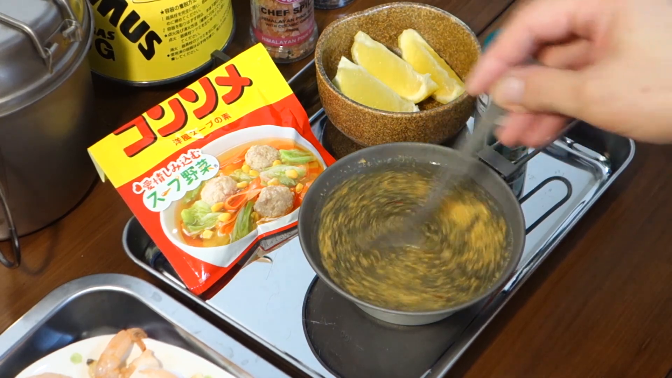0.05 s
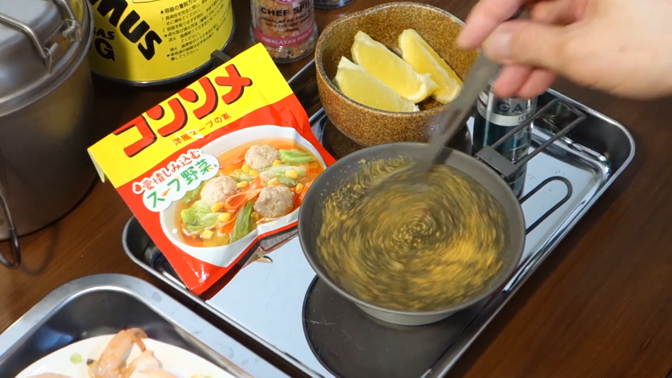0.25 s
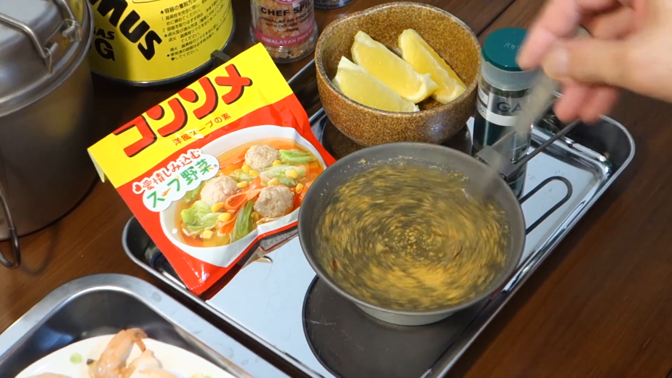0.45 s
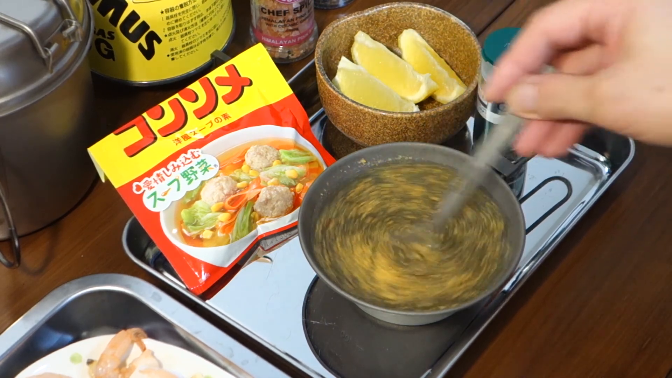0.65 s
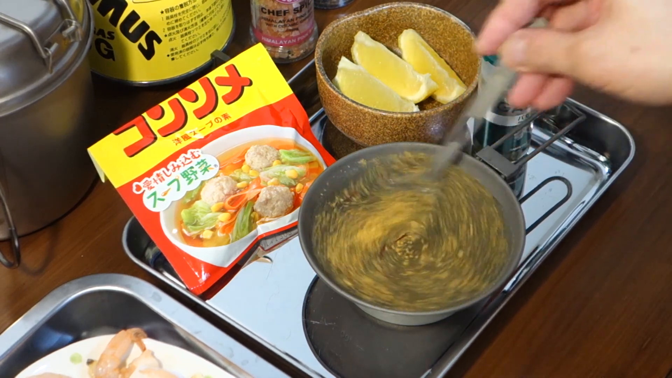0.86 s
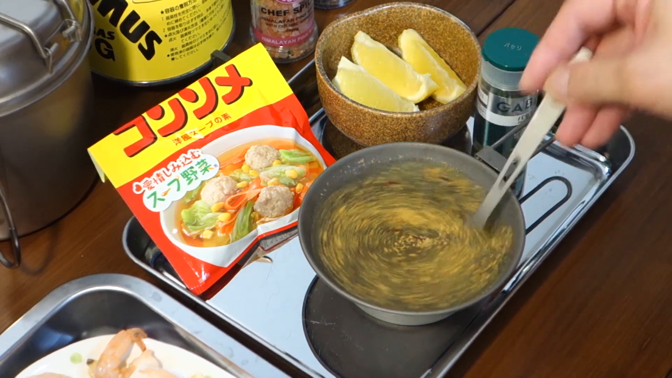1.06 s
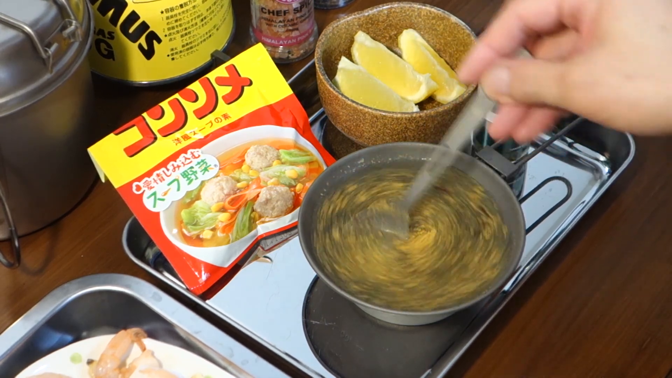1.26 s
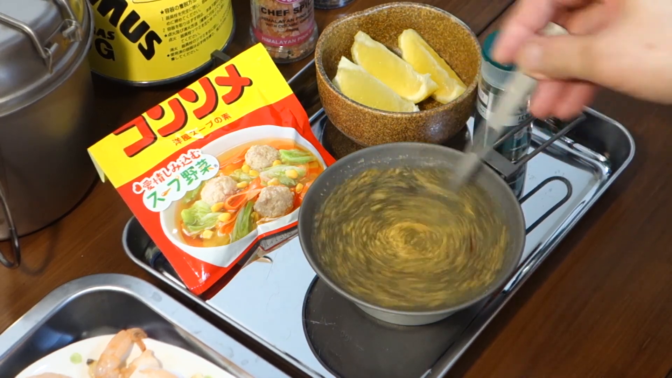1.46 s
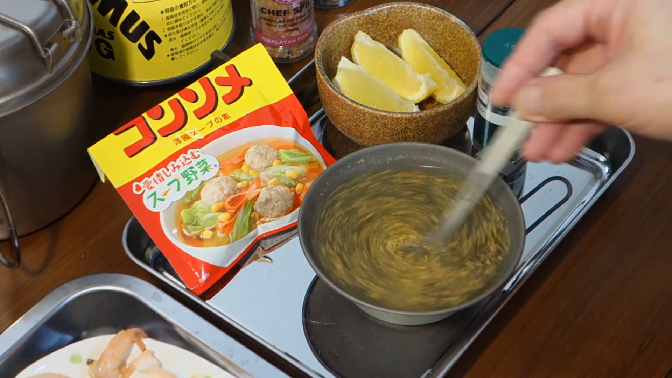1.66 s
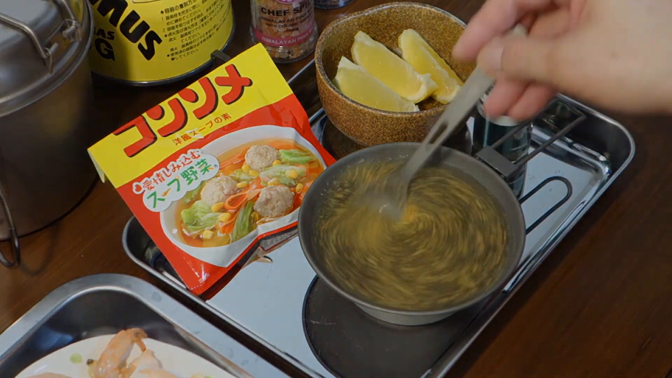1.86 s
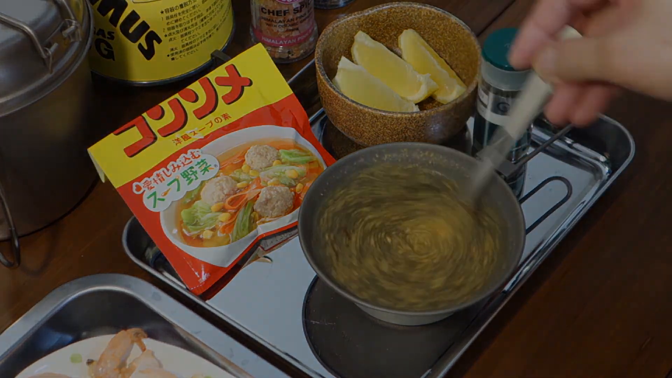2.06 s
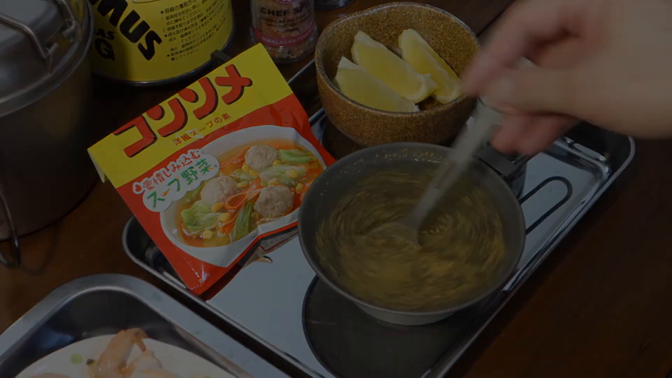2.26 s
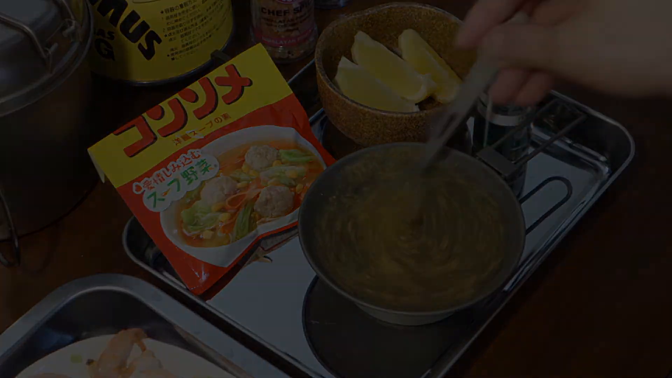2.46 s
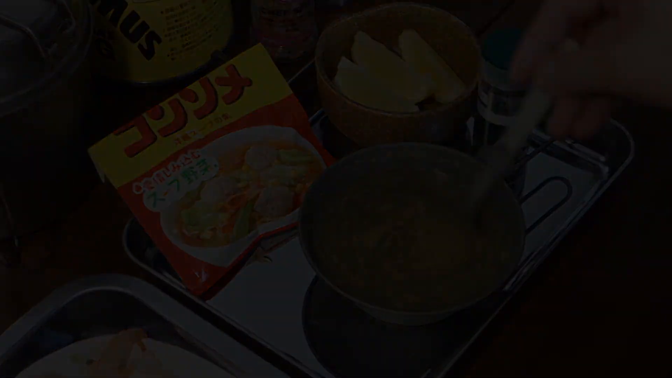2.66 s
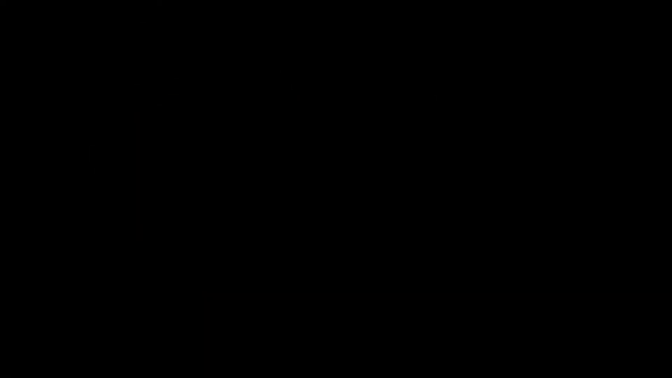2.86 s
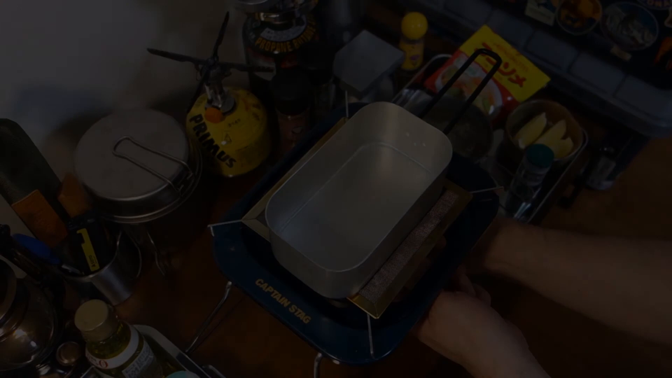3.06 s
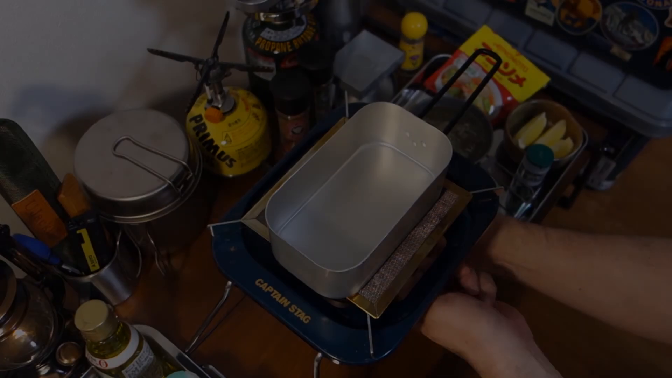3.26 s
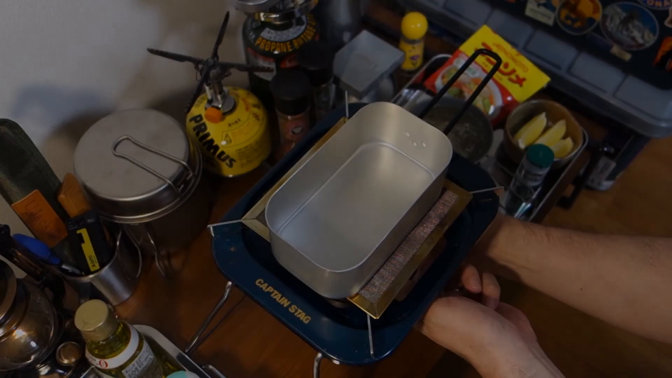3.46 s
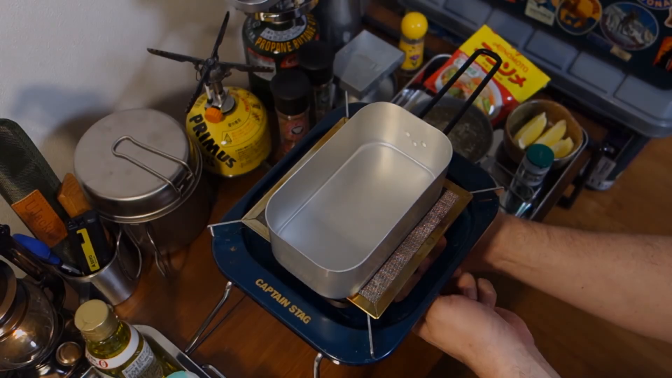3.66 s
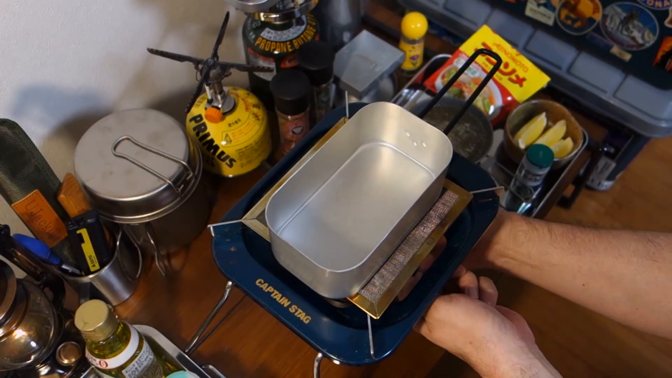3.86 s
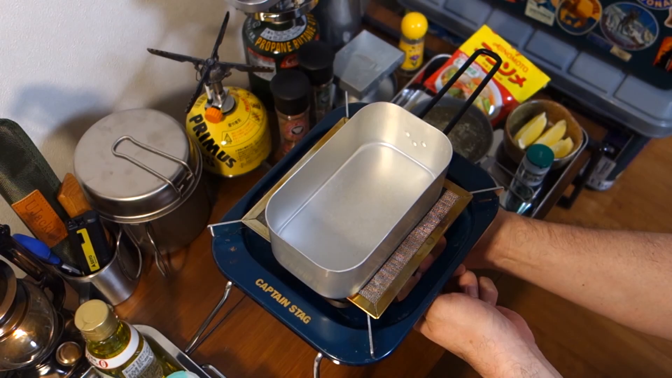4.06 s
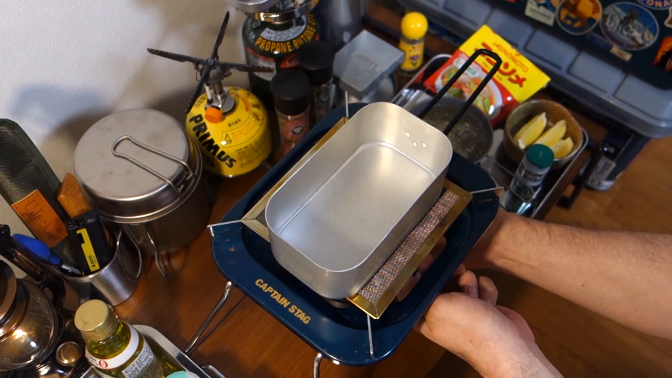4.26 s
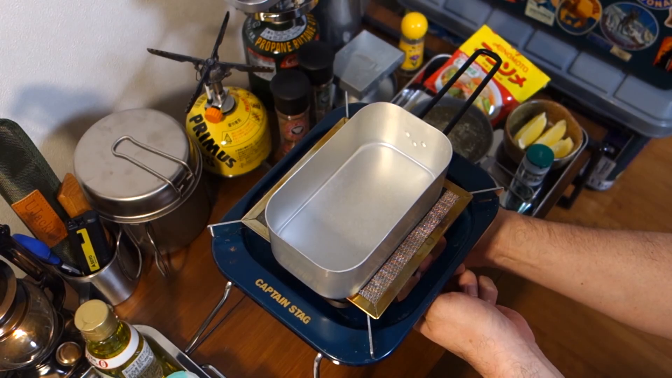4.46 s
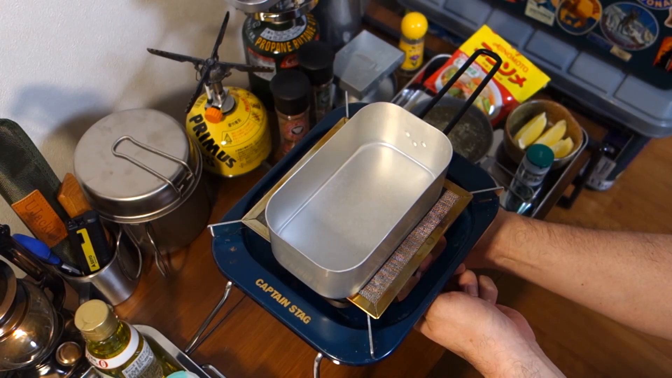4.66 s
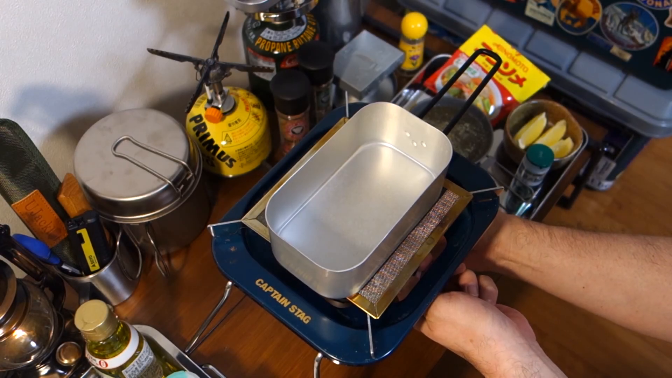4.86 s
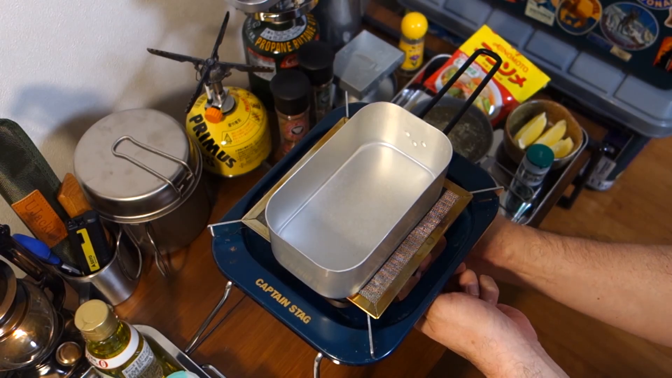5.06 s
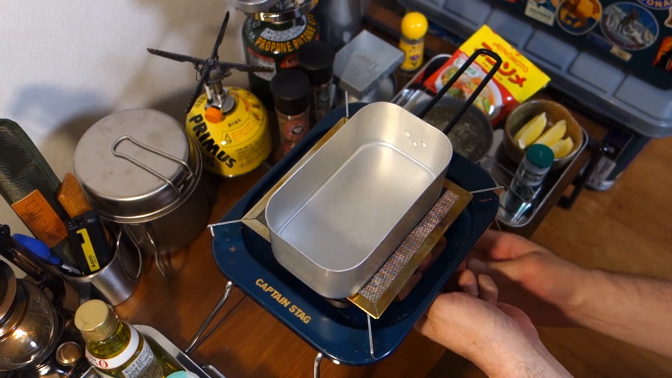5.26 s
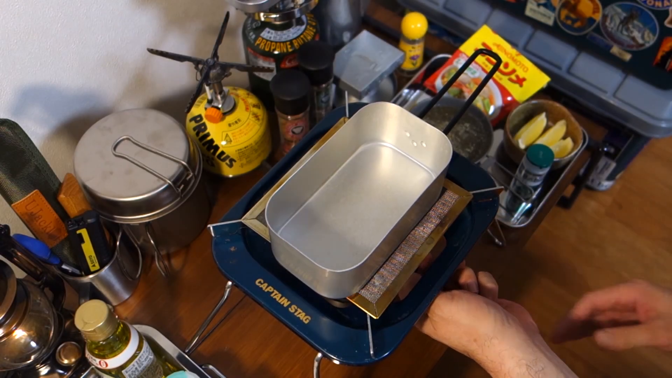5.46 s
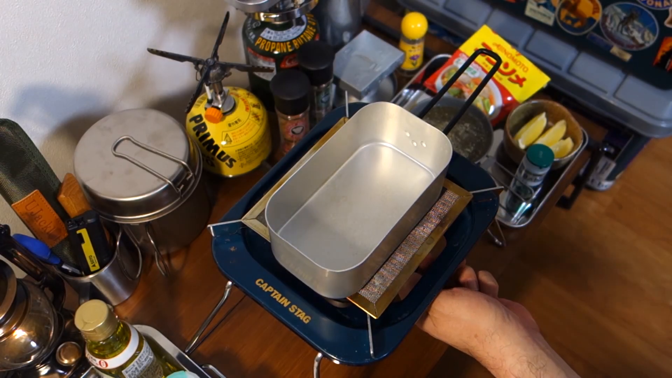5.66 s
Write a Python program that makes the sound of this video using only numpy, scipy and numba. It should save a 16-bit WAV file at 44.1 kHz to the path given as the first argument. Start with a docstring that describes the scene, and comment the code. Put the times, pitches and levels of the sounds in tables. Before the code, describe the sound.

A spoon stirs soup in a small metal bowl, with light, irregular taps and short scrapes over a soft swirl. The stirring fades to silence. Then a gas stove fades in: a faint bump, a thin hiss of gas, and one loud, sharp igniter snap. The burner lights, the knob clicks back and the hiss continues. It all sounds close, in a small room with a steady fan-like rush.

```python
"""A small room with a steady, fan-like rush, where two scenes play one after the other.
First a spoon stirs soup in a small metal bowl, tapping and scraping the wall; this fades out.
Then a gas stove fades in: a hand bumps it, the valve opens and gas hisses, the piezo igniter
(a spring hammer that makes a spark) snaps, the burner lights and the knob clicks back.
A limiter, which turns loud moments down, flattens the snap."""
import sys
import numpy as np
from scipy import signal
from scipy.fft import rfft, irfft
from scipy.io import wavfile
from scipy.ndimage import uniform_filter1d
from numba import njit

SR = 44100
rng = np.random.default_rng(int(sys.argv[2]) if len(sys.argv) > 2 else 0)


def wav_record(signal):
    """Record a signal, one row per channel, as 16-bit PCM in the file named by sys.argv[1]."""
    frames = np.transpose(np.atleast_2d(signal))
    bounded = np.clip(frames, -1, 1)
    # unit amplitude maps onto the largest positive 16-bit level
    quanta = np.round(bounded * 32767).astype(np.int16)
    wavfile.write(sys.argv[1], SR, quanta)


N = 251370
T = np.arange(N) / SR
RING_T = T[:SR // 2]  # time axis for short sounds
HZ = np.fft.rfftfreq(16384, 1 / SR) + 1e-3  # frequency axis for tone curves

# broad tone of the bowl of soup: f/Hz, level/dB
BOWL_TONE = [(120, -61), (200, -18), (286, -15.5), (444, -24.5), (535, -0.5), (968, -18), (1070, -8),
             (2180, 2), (2500, -4), (3890, -5), (4530, -17.5), (5740, -8), (11500, -11.5), (15000, -79),
             (22000, -120)]
# the bowl's modes, the pitches it rings at: f/Hz, width/Hz, level/dB
BOWL_MODES = [(543.4, 47, -3.5), (930, 250, -5.5), (1576, 160, -6.5), (1743, 54, -11), (2060, 210, -5.5),
              (2285, 88, -4.5), (3010, 25, -4), (4036, 174, -2.5), (4090, 100, -18.5), (5710, 200, -14.5),
              (6380, 76, -21.5)]
# stereo width, what differs between the ears against what they share: f/Hz, level/dB
STEREO_WIDTH = [(100, -24.5), (400, -18.5), (1000, -12), (2200, -8.5), (4000, -2), (8500, 0)]


def amp(db):
    """Turn decibels into a gain."""
    return 10 ** (np.asarray(db) / 20)


def unit(x):
    """Scale to an average power of 1."""
    return x / np.sqrt(np.mean(x ** 2))


def curve(points):
    """A tone curve (gain at each frequency) through points of f/Hz, level/dB."""
    hz, db = np.transpose(points)
    return amp(np.interp(np.log(HZ), np.log(hz), db))


def peaks(modes):
    """A tone curve with a peak for each row of f/Hz, width/Hz, level/dB."""
    return np.sqrt(sum(amp(db) ** 2 / (1 + ((HZ / hz - hz / HZ) * hz / width) ** 2)
                       for hz, width, db in modes))


def convolve(x, response):
    """Pass x through a response, keeping its length."""
    return signal.fftconvolve(np.atleast_2d(x), np.atleast_2d(response), axes=1)[:, :x.shape[-1]]


def colour(x, tone):
    """Filter x with a tone curve; white noise keeps its level."""
    cepstrum = irfft(np.log(unit(tone) + 1e-6))
    half = len(cepstrum) // 2
    # folding makes the filter ring only after a sound, never before it
    cepstrum[1:half] *= 2
    cepstrum[half + 1:] = 0
    return convolve(x, irfft(np.exp(rfft(cepstrum)))[:half])


@njit
def resonate(x, hz, width_hz):
    """Let through a band around a moving pitch."""
    out, band_state, low_state = np.empty(len(x)), 0., 0.
    for i in range(len(x)):
        step, damping = np.tan(np.pi * hz[i] / SR), width_hz / hz[i]
        band = (band_state + step * (x[i] - low_state)) / (1 + step * (step + damping))
        band_state = 2 * band - band_state
        low_state += 2 * step * band
        out[i] = damping * band
    return out


def stereo_noise(size):
    """White noise: alike in both ears in the bass, unrelated in the treble."""
    mid, side = rfft(rng.standard_normal((2, size)))
    width = np.interp(np.fft.rfftfreq(size, 1 / SR), HZ, curve(STEREO_WIDTH))
    return irfft(np.array([mid + width * side, mid - width * side]) / np.sqrt(1 + width ** 2), size)


def wander(turns_per_s):
    """A smooth random drift, about 1 in size."""
    hold = int(SR / turns_per_s)
    steps = np.repeat(rng.standard_normal(N // hold + 1), hold)
    return unit(uniform_filter1d(steps, hold)[:N])


def ramp(start_s, length_s):
    """Rise in a straight line from 0 to 1."""
    return np.clip((T - start_s) / max(length_s, 1e-3), 0, 1)


def decay(t60):
    """Die away by 60 dB in t60 seconds."""
    return np.exp(-np.log(1000) * RING_T / t60)


def add(out, start_s, sound):
    """Mix a sound in at its start time."""
    i = int(start_s * SR)
    out[:, i:i + sound.shape[1]] += sound[:, :N - i]


def echoes():
    """The room's dense echoes; the treble dies first."""
    # time the echoes take to fall by 60 dB: f/Hz, t/s
    echo_times = [(200, 0.34), (900, 0.34), (3000, 0.25), (6500, 0.24), (11000, 0.18)]
    hz, t60s = np.transpose(echo_times)
    size = len(RING_T)
    spectrum, bin_hz = rfft(stereo_noise(size)), np.fft.rfftfreq(size, 1 / SR)
    return sum(irfft(spectrum * np.interp(bin_hz, hz, band), size) * decay(t60)
               for band, t60 in zip(np.eye(len(hz)), t60s))


def room(x, echo_db):
    """Blend the direct sound with its echoes."""
    tail = echoes()
    echoed = convolve(x, tail / np.sqrt(np.sum(tail ** 2) / 2))
    return (x + amp(echo_db) * echoed) / np.hypot(1, amp(echo_db))


def fan(rush_db, hum_db):
    """A steady rush of air with a wavering fan hum."""
    # tone of the rushing air: f/Hz, level/dB
    rush_tone = [(18, -50), (30, -63.5), (155, -9.5), (243, -11.5), (283, -5), (320, -8), (644, -3),
                 (3870, -19), (5220, -25.5), (7220, -23), (11600, -30), (15100, -76), (22000, -120)]
    # peaks of the hum: f/Hz, width/Hz, level/dB
    hum_peaks = [(279.9, 7.9, -0.5), (393, 56, -5)]
    rush = colour(stereo_noise(N), curve(rush_tone)) * amp(rush_db + .5 * wander(6))
    hum = colour(stereo_noise(N), peaks(hum_peaks) ** 2) * amp(hum_db)
    return rush + hum


def bowl(modes_db=-4):
    """The bowl's tone curve: soup damps it, so it rings only briefly."""
    return unit(curve(BOWL_TONE)) + amp(modes_db) * unit(peaks(BOWL_MODES))


def swirl(level_db=-66, flutter_db=2):
    """The spoon glides through the soup, dull and soft."""
    muffled = curve([(300, -3), (1500, 5.5), (2400, -10), (4500, -10)])
    return colour(stereo_noise(N), bowl() * muffled) * amp(level_db + flutter_db * wander(8.8))


def taps(chatter_t60=0.092, ring_t60=0.1, ring_width_hz=300, noisy_db=-4, clean_db=-3):
    """The spoon hits the wall with a short chatter and a damped, partly noisy ring."""
    # the spoon's hits: t/s, level/dB, ring f/Hz, ring level/dB, treble level/dB
    hits = [(0.3645, -42, 2150, -9, -6), (0.934, -44.5, 4320, -3, -5), (1.079, -47, 2520, 4, 8),
            (1.143, -51.5, 2476, 8, -8), (1.4694, -49.5, 2839, 6, 4), (1.504, -43, 1490, 2.5, -10),
            (1.545, -44, 1570, -6, -1), (1.678, -40, 2366, -1, -16.5), (2.053, -43.5, 1900, -5, -3),
            (2.299, -48, 1664, -2, -5), (2.539, -36.5, 1680, -7, -10), (2.692, -40, 1900, -6, 0)]
    out = np.zeros((1, N))
    for start_s, db, hz, ring_db, treble_db in hits:
        brightness = curve([(2500, 0), (5000, treble_db + 2.5)])
        chatter = rng.standard_normal(len(RING_T)) * decay(chatter_t60)
        clean = np.sin(2 * np.pi * hz * RING_T) * decay(ring_t60) * (1 - decay(0.0033))
        noisy = colour(chatter, peaks([(hz, ring_width_hz, 0)]) ** 2)
        ring = amp(clean_db) * clean + amp(noisy_db) * noisy
        knock = colour(chatter, bowl() * brightness)
        add(out, start_s, amp(db) * (knock + amp(ring_db) * ring))
    return room(out, echo_db=-2.5)


def strokes(bite_db=-10.5, lift_db=-11.5, grit_per_db=0.33, octaves_per_db=0.17):
    """Force and tone as each stroke bites, presses, holds and lifts; pressure raises grit and pitch."""
    # drags along the wall: t/s, rise/s, hold/s, release/s, grit level/dB, body level/dB,
    # contact level/dB, contact f/Hz, level/dB
    drags = [(.39, 0.089, .02, 0.075, -7.5, -4, -1.5, 2880, -40.5),
             (.58, 0.0097, 0.015, 0.032, -2, -2, -1, 3200, -44.5),
             (0.963, 0.048, 0.09, 0.051, -3.5, 0.5, 0, 3790, -44.5),
             (1.503, 0.0042, .03, 0.026, -7, 1, 7.5, 1420, -54.5),
             (1.538, 0.0287, 0.017, 0.018, -3.5, -1.5, 2.5, 3200, -46.5),
             (2.051, 0.028, .015, 0.053, -7.5, 1, -6, 1670, -46.5),
             (2.299, 0.0022, .008, 0.035, -14, -3.5, 4, 710, -51),
             (2.334, 0.025, 0.011, .04, -1, 0, -2, 2040, -53),
             (2.573, 0.065, 0.057, .048, -5, 4, -2, 3040, -45.5)]
    force = np.zeros(N)
    tone = np.ones((4, N)) * np.array(drags[0][4:8])[:, None]
    for start_s, rise, hold, release, grit_db, body_db, contact_db, hz, db in drags:
        begun = T >= start_s
        lifted = ramp(start_s + rise + hold, release)
        press_db = bite_db * (1 - ramp(start_s, rise)) + lift_db * lifted  # 0 at full pressure
        force += amp(db + press_db) * begun * (lifted < 1)
        pitch = hz * 2 ** (octaves_per_db * press_db)
        stroke_tone = np.broadcast_arrays(grit_db + grit_per_db * press_db, body_db, contact_db, pitch)
        tone = np.where(begun, stroke_tone, tone)
    return force, *tone


def scraping(slips_per_s=5000, scatter_db=3, modes_db=-4, wander_db=4, contact_width_hz=650.):
    """The spoon sticks and slips on the wall; each tiny slip shakes the bowl."""
    # fine rasp of metal on metal: f/Hz, level/dB
    grit_tone = [(3800, -28), (5000, 8.5), (6500, 8.5), (8000, -3.5), (9700, 5), (11500, -16.5)]
    force, grit_db, body_db, contact_db, pitch = strokes()
    slips = (rng.random(N) < slips_per_s / SR) * rng.choice([-1, 1], N)
    slips = unit(slips * amp(scatter_db * wander(500)))
    body = colour(slips, curve(BOWL_TONE) * curve([(4300, 3), (5500, -25)]))
    modes = 0
    for hz, width, db in BOWL_MODES:
        gain = amp(db + wander_db * wander(14))  # each place on the wall favours other modes
        bent_hz = hz * (1 + 0.0059 * wander(10))  # swirling soup bends their pitch
        modes += gain * resonate(slips, bent_hz, float(width))
    # hard metal drives the upper modes more than the low ones
    modes = colour(unit(modes), curve([(1700, -5), (2400, 0.002)]))
    contact = unit(resonate(resonate(slips, pitch, contact_width_hz), pitch, contact_width_hz))
    grit = colour(slips, curve(grit_tone))
    scrape = amp(body_db) * body + amp(modes_db) * modes + amp(contact_db) * contact + amp(grit_db) * grit
    return room(force * scrape, echo_db=-1)


def clack(tone, modes, crack_db, crack_t60, ring_db, ring_t60):
    """A blow on the stove: a crack, the room's echoes and ringing sheet metal."""
    crack = amp(crack_db) * stereo_noise(len(RING_T)) * decay(crack_t60)
    ring = 0
    for hz, db in modes:
        # higher modes die sooner and reach the two ears further out of step
        phase = 2 * np.pi * rng.random()
        ear_shift = np.interp(hz, HZ, curve(STEREO_WIDTH)) * rng.choice([-.7, .7])
        wave = np.sin(2 * np.pi * hz * RING_T + phase + ear_shift * np.array([[1], [-1]]))
        ring += amp(db) * wave * decay(ring_t60 / (1 + hz / 25000))
    return colour(crack + echoes(), tone) + amp(ring_db) * ring * (1 - decay(0.005))


def knob(body_db=-3):
    """The hand bumps the stove, fires the igniter and lets the knob spring back."""
    # tone of the igniter's hammer: f/Hz, level/dB
    hammer_tone = [(71, -51), (120, -64), (295, -4.5), (416, -26), (576, -6), (684, -28), (861, -8),
                   (1100, -28), (1240, -8), (1620, -4), (2070, -9), (2760, -7.5), (5500, -9), (5940, -9),
                   (11600, 3), (15100, -53), (22000, -120)]
    # clusters of sheet-metal modes: f/Hz, width/Hz, level/dB
    stove_body = [(930, 91, -4), (1290, 72, -11), (2070, 89, -1), (2980, 72, -3.5), (3360, 49, -19),
                  (4440, 540, -5.5), (6040, 180, -0.5), (7420, 160, 1)]
    # ring of the sheet metal: f/Hz, level/dB
    stove_modes = [(830, -6), (883, -2), (974, -3), (1040, -5), (1220, -4), (1265, -3), (1317, -5),
                   (1707, -9), (2071, 0), (2156, -5), (2278, -6), (3365, -7), (4136, -9), (4434, -8),
                   (5729, -7), (6012, -5), (6045, -6), (7500, -9), (8867, -8), (10933, -6), (11051, -6)]
    # tone of the knob springing back: f/Hz, level/dB
    click_tone = [(88, -36), (150, -40), (294, -12), (431, -32), (546, -14.5), (800, -12), (876, -3.5),
                  (1460, -18), (2220, -13.5), (2560, -15), (2760, -10.5), (4590, -5), (4930, -11),
                  (6030, -2), (11600, -20), (15100, -50), (22000, -120)]
    # ring after that click: f/Hz, level/dB
    click_modes = [(880, -4), (2160, -8), (2751, -8), (3320, -5), (4030, -7), (4710, -5), (6060, -2),
                   (6975, -4), (7100, -4), (7495, -4)]
    bump_tone = curve([(70, -40), (150, 9), (500, -5), (1600, 4), (2600, -11), (5000, -7), (11000, -24)])
    bump_modes = [(143, -4.5), (1600, -5.5)]
    snap_tone = np.hypot(unit(curve(hammer_tone)), amp(body_db) * unit(peaks(stove_body)))
    bump = clack(bump_tone, bump_modes, crack_db=4.5, crack_t60=.04, ring_db=-3.5, ring_t60=0.69)
    snap = clack(snap_tone, stove_modes, crack_db=5.5, crack_t60=0.069, ring_db=-10, ring_t60=0.23)
    click = clack(curve(click_tone), click_modes, crack_db=8, crack_t60=.061, ring_db=-.5, ring_t60=.14)
    out = np.zeros((2, N))
    add(out, 3.212, amp(-50) * bump)
    add(out, 4.4155, amp(-13.5) * snap)
    add(out, 4.8223, amp(-30) * click)
    return out


def burner(valve_s=3.7, valve_lag_s=0.12, ignite_s=4.43, gas_db=-62.5, flame_db=-72):
    """Gas whistles through the jet and mixing tube; the flame catches, flares and flutters low."""
    # whistles of the jet before lighting: f/Hz, width/Hz, level/dB
    cold_jet = [(5800, 89, 1), (6150, 70, -1), (7800, 74, 11), (8380, 130, 10), (8970, 70, 9),
                (11000, 180, -1)]
    # its shifted whistles once lit: f/Hz, width/Hz, level/dB
    lit_jet = [(5770, 23, -1), (6030, 27, -8), (8330, 110, -5), (9150, 29, 1), (9440, 46, -7),
               (10900, 190, -18)]
    treble = curve([(3500, -35), (5500, -9)])
    rush_tone = curve([(4000, -26), (6000, -3), (7000, -10), (8600, -12), (10200, -10), (13000, -50)])
    tube_tone = peaks([(2460, 620, 0)]) ** 2
    gas_tone = amp(-1) * unit(rush_tone) + amp(-2) * unit(tube_tone)
    cold, hot = (colour(stereo_noise(N), unit(peaks(jet) * treble) + gas_tone)
                 for jet in (cold_jet, lit_jet))
    hot_share = ramp(4.55, .2)
    gas = np.sqrt(1 - hot_share) * cold + np.sqrt(hot_share) * amp(-2.5) * hot
    flow = 1 - np.exp(-np.maximum(T - valve_s, 0) / valve_lag_s)
    alight = ramp(ignite_s, .07)
    flare = alight * (1 - ramp(ignite_s + 0.15, 0.11))  # hiss and flame swell, then settle
    hiss = gas * flow * amp(gas_db + 7.5 * flare + 0.24 * wander(17))
    flame_tone = curve([(40, -23), (100, -7.5), (180, 6), (300, -6), (900, -37), (4000, -54)])
    flame = colour(stereo_noise(N), flame_tone) * alight
    return hiss + flame * amp(flame_db + 3.5 * flare + 1.2 * wander(15))


def scene(stove_s=2.972, entry_gain=.11):
    """The stirring fades to silence; then the stove, nearer the fan, enters softly and grows."""
    stirring = scraping() + taps() + swirl() + fan(rush_db=-56, hum_db=-67)
    lighting = knob() + burner() + fan(rush_db=-55.5, hum_db=-63.5)
    fade_out = (1 - ramp(start_s=1.406, length_s=1.55)) ** 1.003
    fade_in = (T >= stove_s) * (entry_gain + (1 - entry_gain) * ramp(stove_s, length_s=1))
    return stirring * fade_out + lighting * fade_in


def record(dry, limit_db=-25.5, window_s=0.0043, top_hz=11700):
    """A fast limiter holds loud moments down; a steep filter removes the highest treble."""
    power = uniform_filter1d(np.mean(dry ** 2, axis=0), int(window_s * SR))
    limited = dry / (1 + (power / amp(limit_db) ** 2) ** 2) ** (1 / 4)
    return signal.sosfilt(signal.ellip(10, .2, 75, top_hz, fs=SR, output="sos"), limited)


dry = scene()
out = record(dry)
wav_record(out)
```